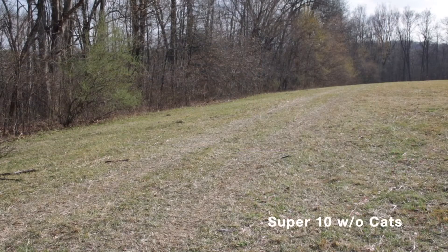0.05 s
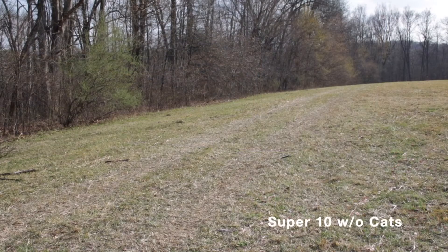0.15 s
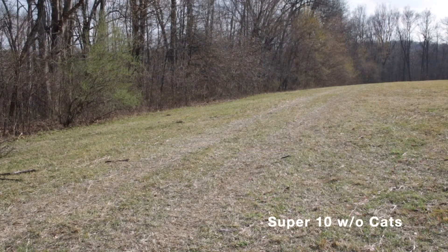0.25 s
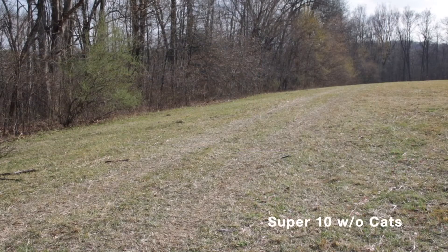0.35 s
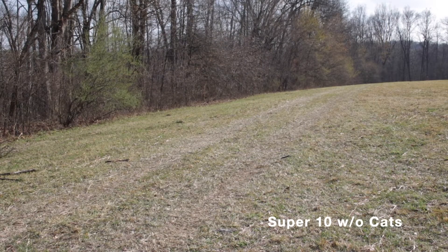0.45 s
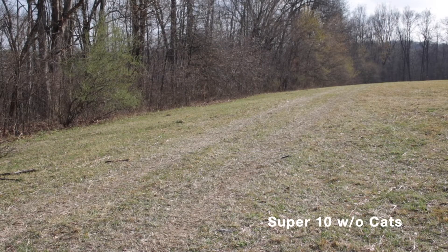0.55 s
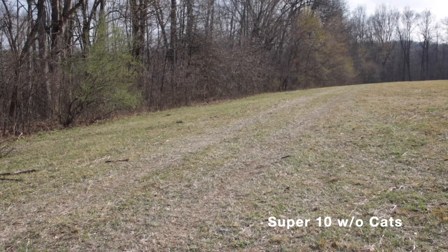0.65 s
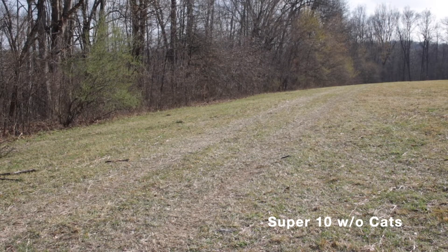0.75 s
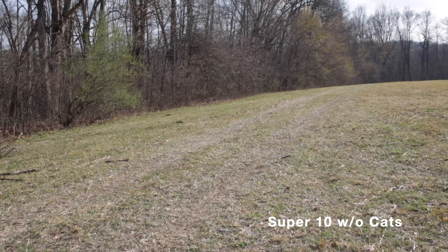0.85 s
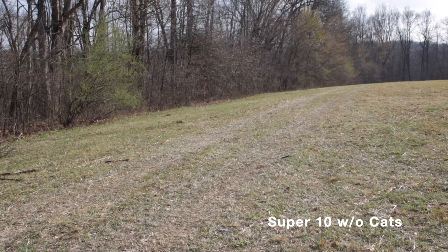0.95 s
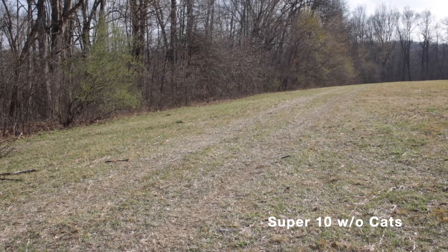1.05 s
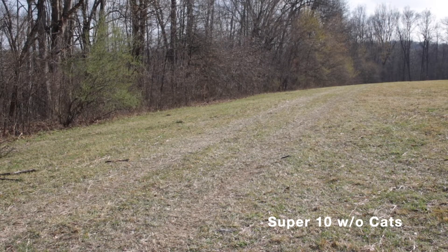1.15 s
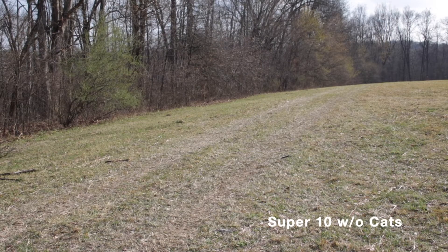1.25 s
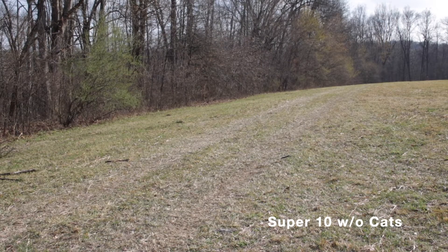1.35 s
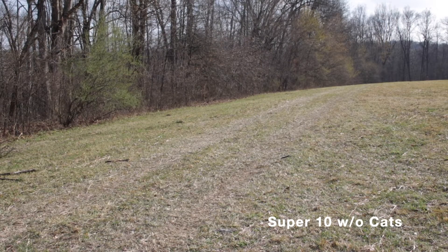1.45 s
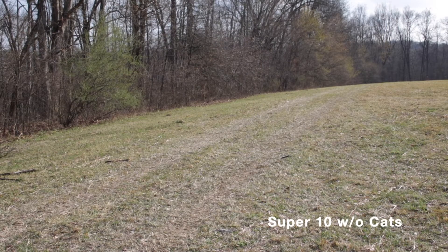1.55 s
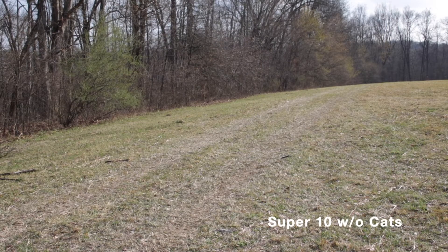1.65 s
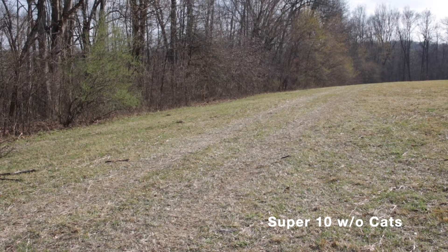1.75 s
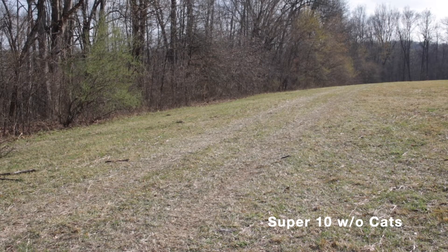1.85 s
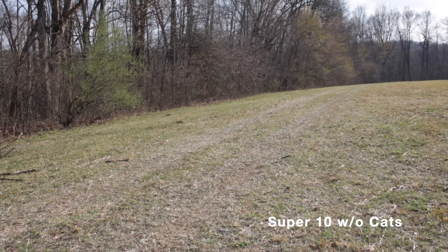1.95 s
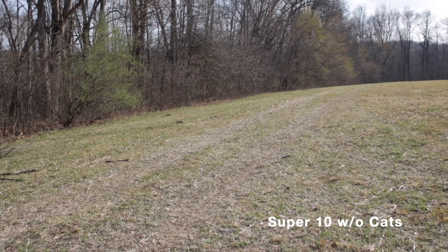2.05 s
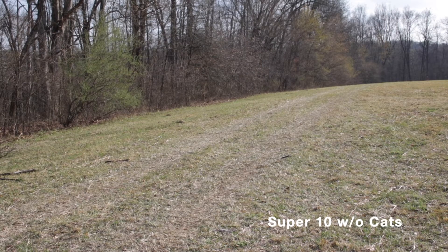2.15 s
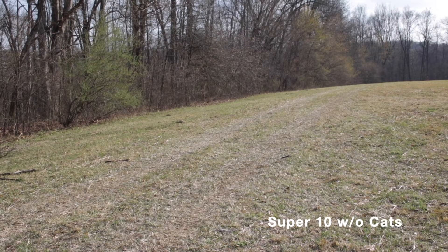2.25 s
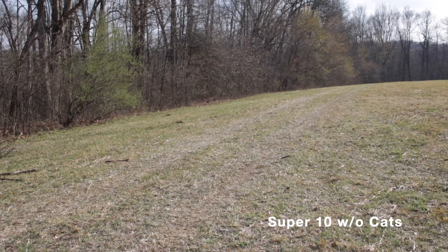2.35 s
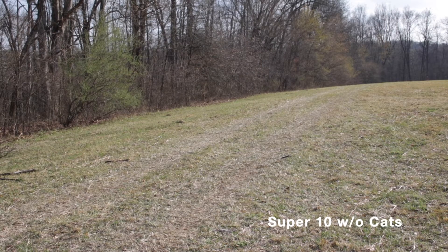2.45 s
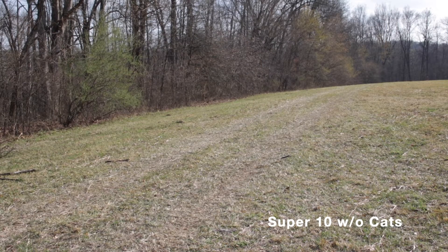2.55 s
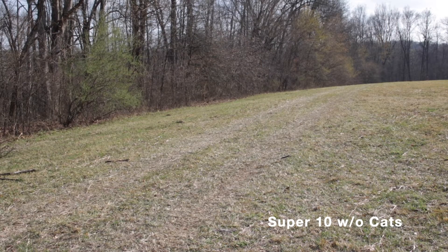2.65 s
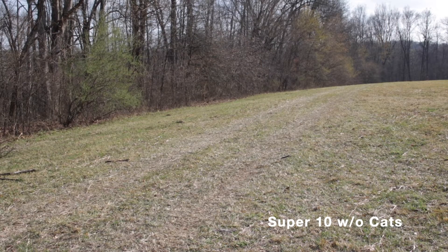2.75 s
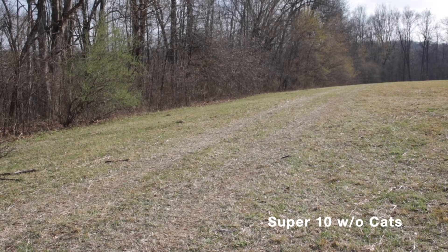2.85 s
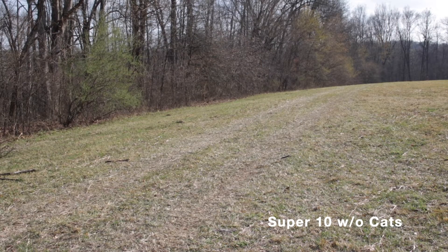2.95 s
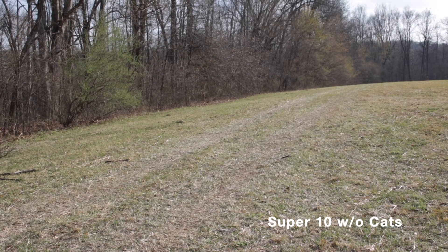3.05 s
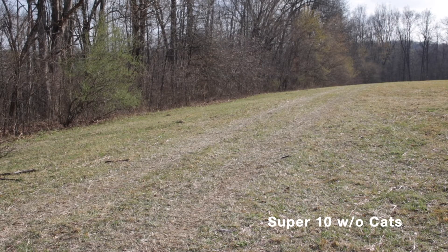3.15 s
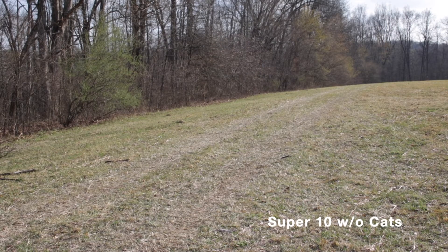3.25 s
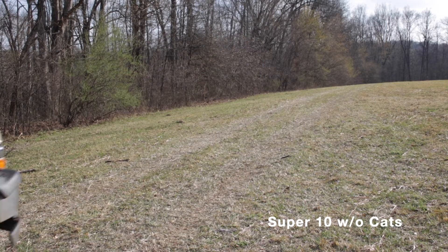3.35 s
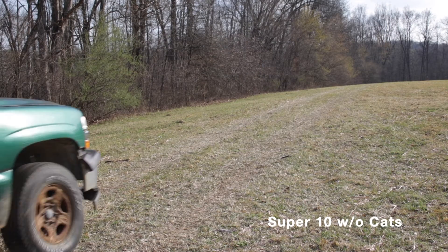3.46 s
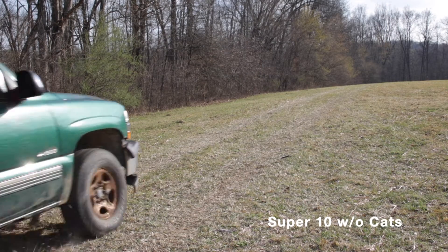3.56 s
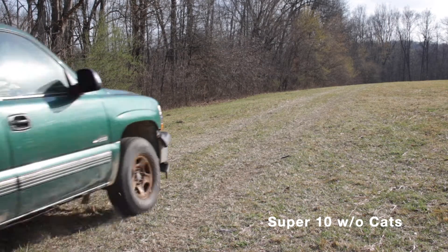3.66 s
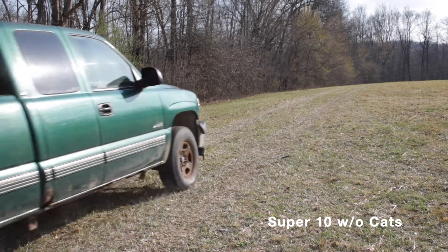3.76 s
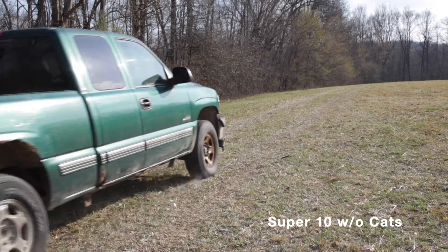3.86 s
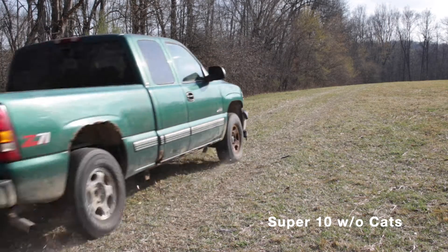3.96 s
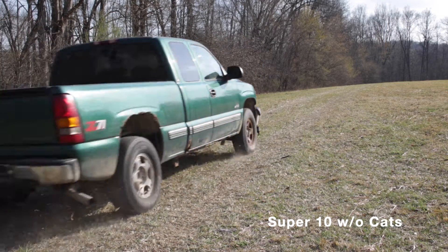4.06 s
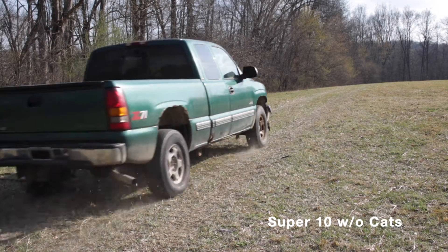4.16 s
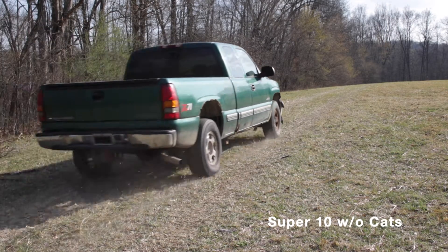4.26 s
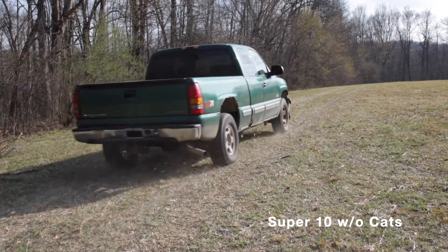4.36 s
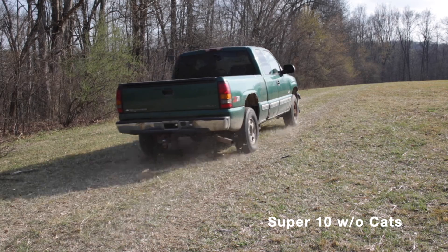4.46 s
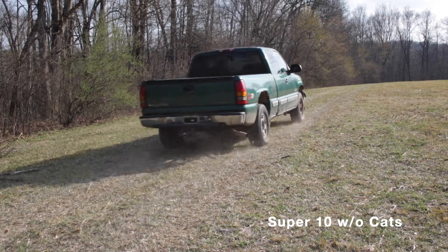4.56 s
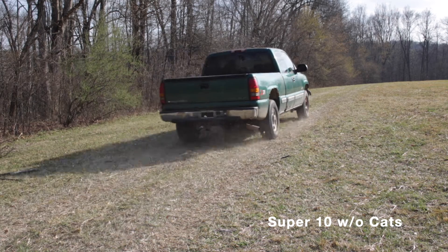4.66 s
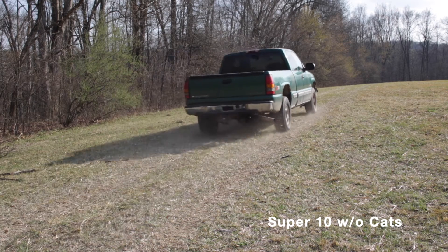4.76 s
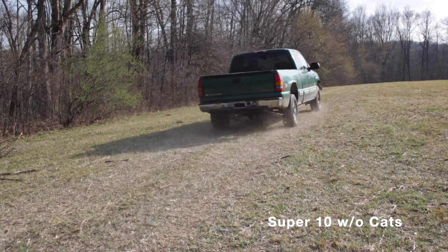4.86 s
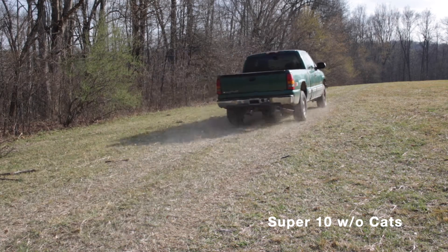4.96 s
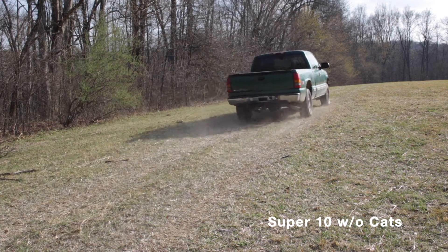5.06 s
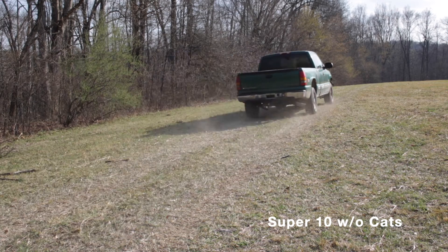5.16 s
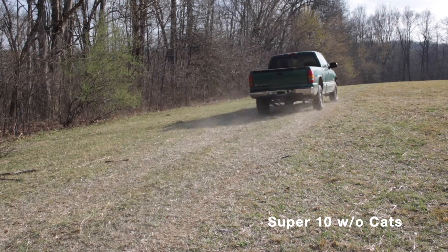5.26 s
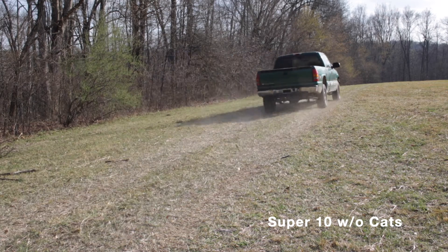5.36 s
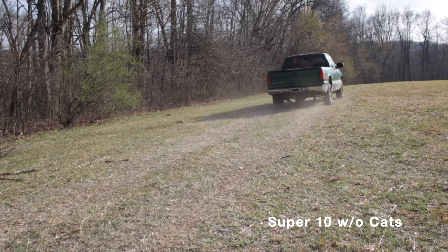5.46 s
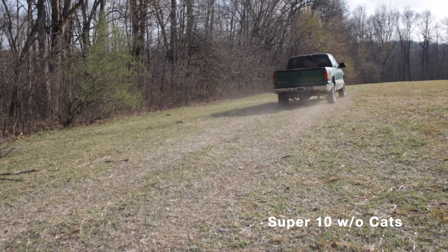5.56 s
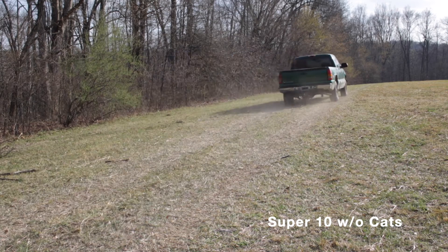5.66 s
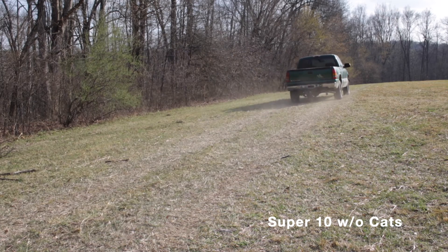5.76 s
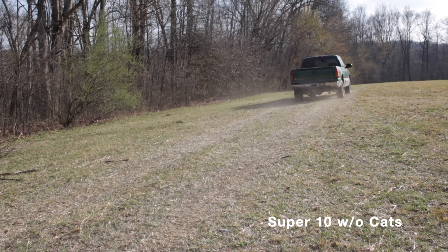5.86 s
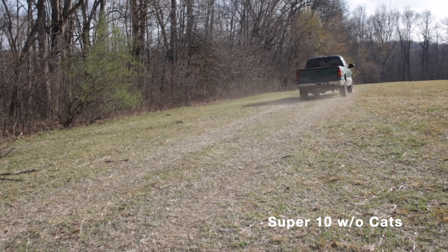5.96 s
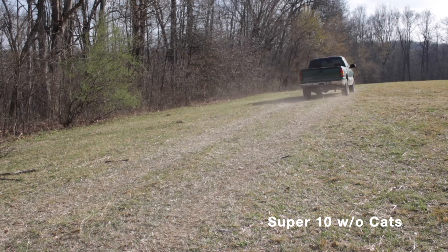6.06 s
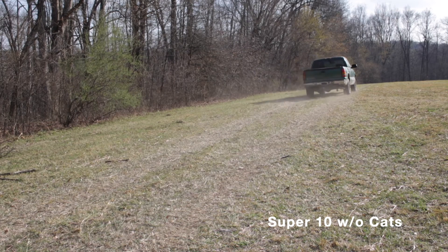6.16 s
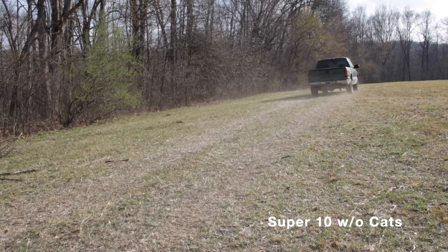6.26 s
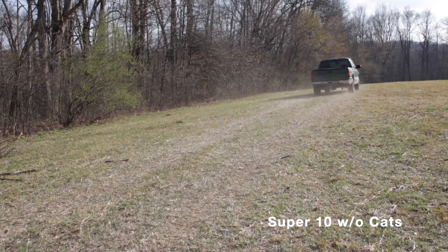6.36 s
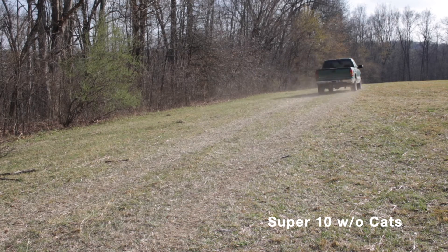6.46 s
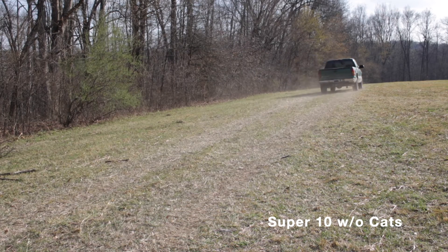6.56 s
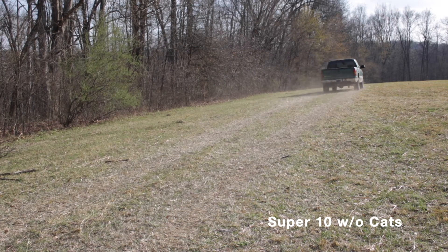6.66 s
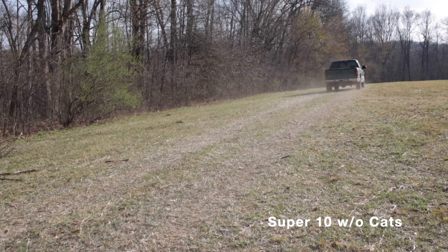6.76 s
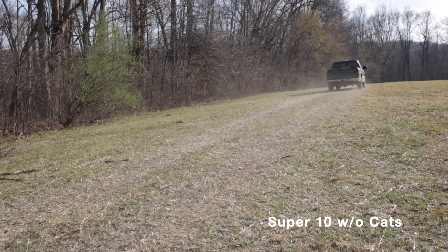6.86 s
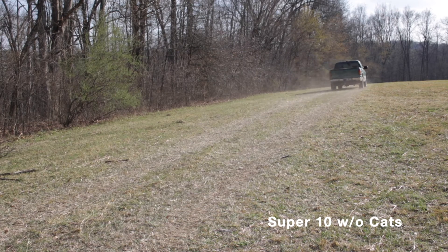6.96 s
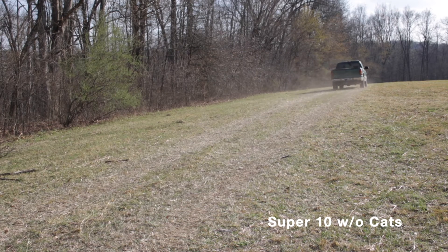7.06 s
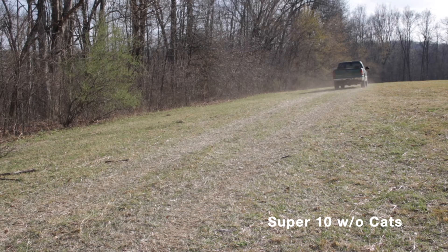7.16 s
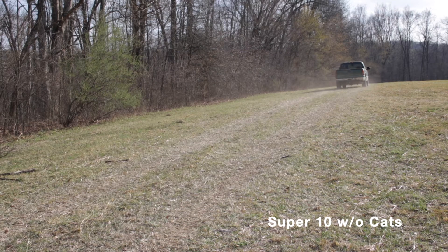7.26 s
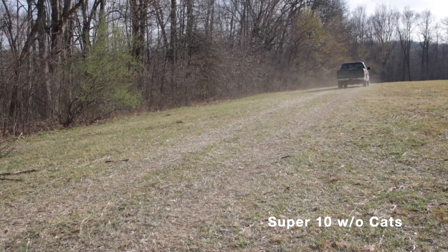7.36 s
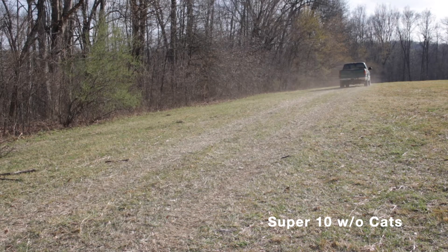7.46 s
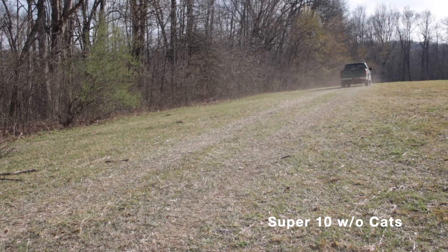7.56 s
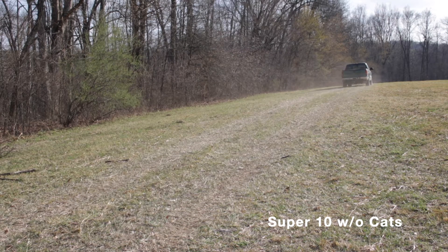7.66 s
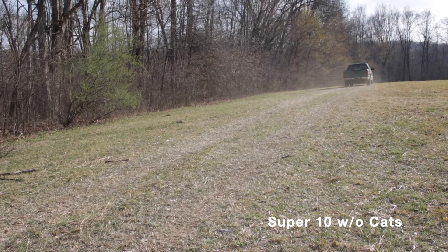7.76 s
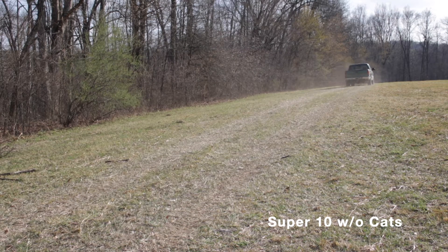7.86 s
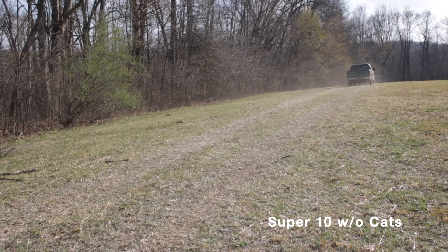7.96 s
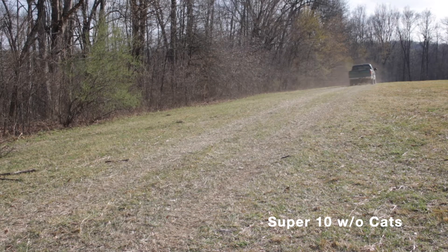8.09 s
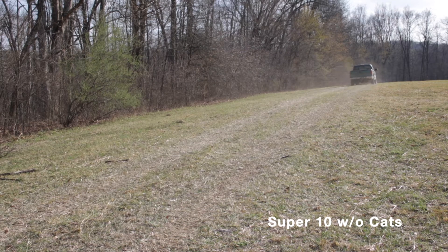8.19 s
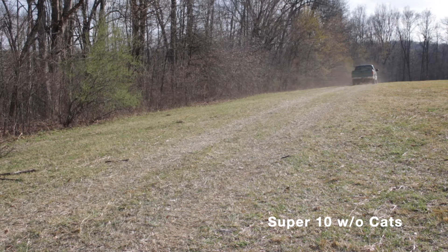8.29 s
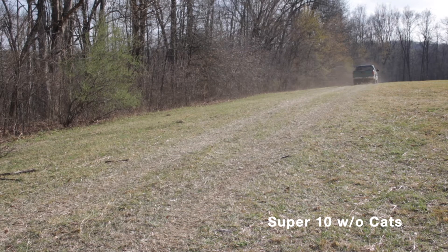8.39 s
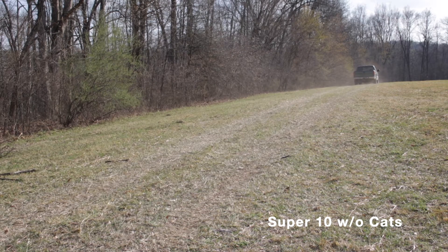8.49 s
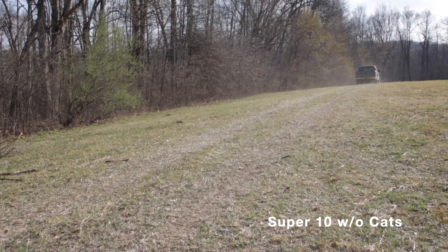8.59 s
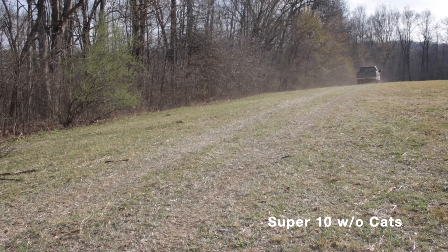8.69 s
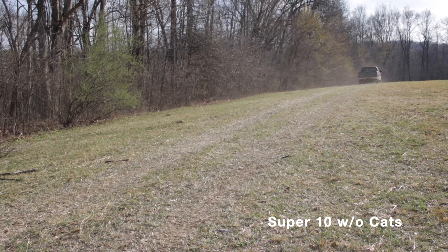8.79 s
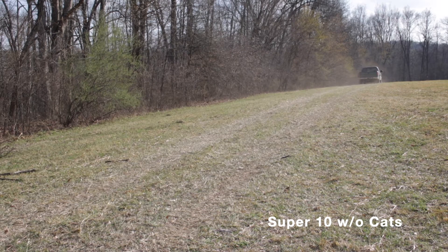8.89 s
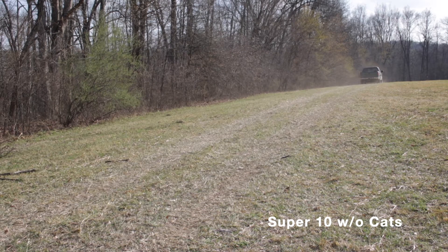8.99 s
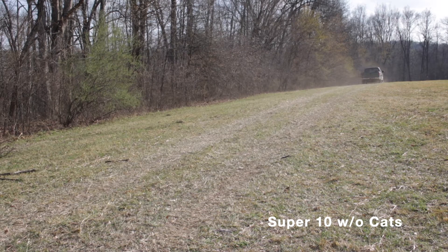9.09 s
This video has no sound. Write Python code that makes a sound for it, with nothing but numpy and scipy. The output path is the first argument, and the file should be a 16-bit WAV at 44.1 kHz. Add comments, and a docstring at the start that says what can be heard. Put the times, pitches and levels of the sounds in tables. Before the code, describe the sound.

A loud-piped pickup on dry dirt, heard from beside the track. Quiet at first: low burble, soft hiss, a faint rising whine. The engine climbs and swells within a couple of seconds, thumps over ruts and bursts past with gritty tyre noise and a low air thud. Loose metal rattles and clanks behind it; the revs fall, the exhaust crackles under power, drops again and continues more softly into the distance.

```python
"""A distant engine burbles over a faint hiss from the truck's front; a loud V8 pickup comes up a dirt track,
passes and drives off. Each firing sends a pulse into resonant pipes; the two cylinder banks beat unevenly.
It shifts up twice. Shaped noise makes the hiss, gas cracks, tyre rush, fizz and the gust of the passing body;
sines make a faint rising whine, ruts that boom the body and loose metal that clanks.
Loud peaks overload the microphone."""
import sys
import numpy as np
from scipy import signal
from scipy.fft import rfft, irfft, next_fast_len
from scipy.io import wavfile
from scipy.ndimage import uniform_filter1d, map_coordinates

SR = 44100
rng = np.random.default_rng(int(sys.argv[2]) if len(sys.argv) > 2 else 0)


def digitize_waveform(pressure):
    """Quantize a signal to 16-bit integers and store it at the path in sys.argv[1].

    Rows of a 2-D input are taken as channels; values are limited to [-1, 1].
    """
    field = np.atleast_2d(pressure).T
    bounded = np.clip(field, -1, 1)
    quanta = np.round(bounded * 32767).astype(np.int16)
    wavfile.write(sys.argv[1], SR, quanta)


N = 402633  # length in samples


def amp(db):
    """Gain of a level in dB."""
    return 10 ** (np.asarray(db) / 20)


def curves(rows):
    """Draw straight lines between table rows: one value per sample for each column after the time."""
    seconds, *columns = np.transpose(rows)
    return [np.interp(np.arange(N) / SR, seconds, column) for column in columns]


def steady(x):
    """Even out the loudness: bring x to rms 1 over a short sliding window."""
    power = uniform_filter1d(uniform_filter1d(x ** 2, size=SR // 6), size=SR // 6)
    return x / np.sqrt(np.abs(power) + 1e-20)


def wobble(rate):
    """A smooth random curve through rate random points a second."""
    points = rng.standard_normal(int(N * rate / SR) + 4)
    return map_coordinates(points, [np.arange(N) * rate / SR])


def filtered(x, response):
    """Filter x by a complex response that depends on frequency."""
    m = next_fast_len(N + SR // 2)
    spectrum = rfft(x, m) * response(np.fft.rfftfreq(m, 1 / SR))
    return irfft(spectrum, m)[..., :N]


def causal(points):
    """Minimum-phase response through (Hz, dB) points: it never rings before its input."""
    def response(hz):
        f, db = np.transpose(points)
        gain = amp(np.interp(np.log(hz + 1), np.log(f + 1), db))
        cepstrum = irfft(np.log(gain))
        # fold the second half onto the first to get minimum phase
        cepstrum[1:len(cepstrum) // 2] *= 2
        cepstrum[len(cepstrum) // 2 + 1:] = 0
        return np.exp(rfft(cepstrum))
    return response


def noise(points):
    """Random noise of even loudness, coloured by (Hz, dB) points."""
    return steady(filtered(rng.standard_normal(N), causal(points)))


def pulses(at, sizes):
    """Impulses at fractional sample positions, each shared between two samples."""
    i = np.clip(at, 0, N - 2).astype(int)
    part = np.clip(at - i, 0, 1)
    return np.bincount(i, sizes * (1 - part), N) + np.bincount(i + 1, sizes * part, N)


def decay(x, seconds):
    """Let every impulse in x die away exponentially."""
    return signal.lfilter([1], [1, -np.exp(-1 / (seconds * SR))], x)


def pipe(modes, shift, low_hz, top_hz, holes=()):
    """Pipe resonances, pitches multiplied by shift; the open end radiates little bass, the muffler eats the top."""
    def response(f):
        ends = f ** 4 / (f ** 4 + low_hz ** 4) / (1 + 1j * f / top_hz) ** 2
        hole = np.prod([(c * c - f * f + .1j * f * w) / (c * c - f * f + 1j * f * w) for c, w in holes], axis=0)
        rings = sum(amp(db) * w * c / ((c * shift) ** 2 - f * f + 1j * f * w) for c, w, db in modes)
        return ends * hole * rings
    return response


# Blend of nose and tail sound: it starts mixed, falls to 0, then rises. Each row: time in seconds,
# share of the tail (0 is all nose, 1 all tail pipe).
FACING = [(0, 0.56), (3.7, 0), (4.2, 0.94), (9.13, 1)]


def tail_share():
    """How much of the tail sound, rather than the nose sound, is heard."""
    return curves(FACING)[0]


def side(coming, going):
    """Blend the coming and going values of a setting by the tail share."""
    return coming + (going - coming) * tail_share()


# Echo off the soil: inverted at grazing angles, later and upright close by.
# Each row: time in seconds, delay in ms, strength as a gain.
SOIL_ECHO = [(0, .294, -.75), (2.95, .3, -.6), (3.1, .42, .3), (3.3, .56, .5), (3.72, .9, .45),
             (4.2, .52, .5), (4.5, .4, 0)]


def with_soil_echo(x):
    """Add the slightly dulled reflection from the ground, which arrives a moment after the direct sound."""
    delay_ms, strength = curves(SOIL_ECHO)
    dulled = uniform_filter1d(x, size=3)
    return x + strength * np.interp(np.arange(N) - delay_ms * SR / 1000, np.arange(N), dulled)


def turned(x, coming, going, echo=False):
    """x through the coming and going filters, blended by the tail share."""
    tail = tail_share()
    heard = (1 - tail) * steady(filtered(x, coming)) + tail * steady(filtered(x, going))
    return steady(with_soil_echo(heard) if echo else heard)


# How fast the engine fires. Each row: time in seconds, firings a second as heard.
FIRING_RATE = [(0.0, 86.3), (0.36, 95.52), (0.72, 95.84), (1.75, 102.48), (2.15, 111.15), (2.47, 133.27),
               (3.04, 145.34), (3.3, 160.1), (3.58, 164.82), (3.84, 176.05), (4.12, 161.52), (4.22, 165.96),
               (4.38, 152.67), (4.68, 108.79), (4.75, 104.56), (5.41, 114.57), (5.57, 120.59),
               (5.94, 123.62), (6.24, 119.63), (6.35, 121.51), (6.85, 121.77), (6.99, 118.18),
               (7.28, 120.65), (7.6, 121.05), (7.9, 108.44), (8.54, 107.93), (9.13, 115.1)]
# One engine cycle. Each row is a cylinder: bank sign, sharpness in dB before a random spread.
CYLINDERS = [(1, -17), (-1, -15), (1, 0), (1, -7), (-1, -15), (1, -3), (-1, -10), (-1, -9)]


def firings():
    """Time and size every firing with small random errors; also give its number and its sharp pulse."""
    fired = np.cumsum(curves(FIRING_RATE)[0]) / SR
    k = np.arange(int(fired[-1]))
    chance = rng.standard_normal((len(k), 3))
    at = np.interp(k + .42, fired, np.arange(N)) + .00006 * SR * chance[:, 0]
    size = amp(.6 * chance[:, 1])
    sharp_db = np.transpose(CYLINDERS)[1]
    # from the front the sharpest firings arrive one place later
    late = (tail_share()[at.astype(int)] < .5).astype(int)
    sharp = pulses(at, amp(sharp_db[(k - late) % 8] + 1.5 * chance[:, 2]))
    return k, at, size, sharp


# Level of the exhaust note. Each row: time in seconds, level in dB before the boost at the pass.
EXHAUST = [(0.0, -43), (1.55, -32.5), (1.75, -28), (2.21, -27), (2.9, -12.5), (3.28, -14), (3.58, -9),
           (3.89, -4.5), (4.42, -15), (4.58, -8), (4.65, -16.5), (4.78, -11.5), (5.39, -16), (5.95, -13),
           (6.26, -17), (6.92, -16), (7.02, -20), (7.45, -17.5), (7.86, -20), (7.93, -16.5), (8.26, -16.5),
           (9.13, -23)]


def exhaust_levels():
    """Levels in dB of the even tone and the uneven burble, whose share grows with the revs."""
    boost_db, closest_s, pass_s = 3, 3.86, 0.26  # extra drive, its time and half length
    low_db, high_db, middle_hz, span_hz = -8, -0.5, 118.2, 7.6  # burble over tone, by firings a second
    t = np.arange(N) / SR
    note_db = curves(EXHAUST)[0] + boost_db * np.exp(-((t - closest_s) / pass_s) ** 2)
    rate = curves(FIRING_RATE)[0]
    over_db = low_db + (high_db - low_db) / (1 + np.exp((middle_hz - rate) / span_hz))
    # share the power between the two
    tone_db = note_db - 10 * np.log10(1 + amp(over_db) ** 2)
    return tone_db, tone_db + over_db


def piped(x, modes, **ends):
    """Firings ringing in one pipe, with higher pitches in the coming sound than in the going sound."""
    return turned(x, pipe(modes, 1.054, **ends), pipe(modes, 0.95, **ends))


# Pipe resonances of the even tone. Each row: base pitch in Hz (shifted in use), width in Hz, strength in dB.
TAIL_PIPE = [(124, 83, 27), (245, 13.3, 19), (394, 28, -27), (472, 29, -30.5), (634, 22, -33.5)]


def even_tone(at, size):
    """Every firing rings the tail pipe alike, which gives the steady note."""
    return piped(pulses(at, size), TAIL_PIPE, low_hz=51, top_hz=394)


# Uneven filling, one row per cylinder: push into its bank in dB, signed share of the uneven filling.
FILLING = [(-4, 0.61), (2, -0.099), (3, -0.49), (1.5, 0.37), (1.9, 1), (1, 0.11), (1, -.92), (-0.7, -0.67)]
# Bank pipe from the front and from behind. Each row: base pitch in Hz (shifted in use),
# width in Hz, strength in dB.
BANK_FRONT = [(68.5, 10, -10.5), (118.2, 9.3, -3.5), (210.7, 16, 4), (320.3, 13.8, -0.5),
              (418.5, 4.6, -16.5), (508, 22, -7)]
BANK_REAR = [(80, 4.3, -8.5), (190.9, 27.3, 12.5), (302.4, 15.6, 10.5), (428, 21, 3), (547, 35, -6),
             (688, 15, -7), (964, 28, -8.5)]
# What the muffler swallows: one list coming, one going. Each row: pitch in Hz, width in Hz.
MUFFLER_HOLES = ([(136, 20), (236, 19)], [(147, 59), (250, 48), (345, 74)])
# Header resonances. Each row: base pitch in Hz (shifted in use), width in Hz, strength in dB.
HEADERS = [(143, 19, -4), (287, 45, -12.5), (390.7, 8.3, 0), (537, 33, -17)]


def uneven_burble(k, at, size):
    """What one bank pushes the other does not: the uneven beat of a cross-plane crank."""
    bank = np.transpose(CYLINDERS)[0]
    push_db, uneven = np.transpose(FILLING)
    bank_push = (bank * amp(push_db))[k % len(bank)]
    front = pipe(BANK_FRONT, 0.927, low_hz=65, top_hz=1100, holes=MUFFLER_HOLES[0])
    rear = pipe(BANK_REAR, 0.95, low_hz=61, top_hz=1080, holes=MUFFLER_HOLES[1])
    banks = turned(pulses(at, size * bank_push), front, rear)
    headers = piped(pulses(at, size * uneven[k % len(bank)]), HEADERS, low_hz=102, top_hz=1070)
    return banks + amp(-6.5) * headers


def pipe_rumble():
    """Turbulence in the pipes, made as a band of low noise."""
    return noise([(45, -47.0), (90, 10.5), (200, 13), (450, 8.0), (800, -52.5)])


def gas(puff, depth):
    """Rushing gas noise; each firing blows a short gust through it."""
    return (1 + depth * puff) * rng.standard_normal(N)


def grit(rate, spread_db):
    """Gain that jumps for about a millisecond wherever a tyre cracks a clod or stem, rate times a second."""
    draw = rng.random((int(rate * N / SR), 2))
    sizes = .3 * amp(-spread_db * np.log(draw[:, 1] + .004))
    return 1 + decay(pulses(draw[:, 0] * N, sizes), 0.0015)


# Engine load. Each row: time in seconds, how hard the firings crack against the steady gas noise.
LOAD = [(0, .15), (2.3, .2), (2.45, 1.4), (2.7, 1.2), (2.85, .45), (3.5, .45), (4.5, .5), (5.5, .6),
        (5.8, 1.1), (6.9, 1.1), (7.6, .6), (7.9, .2), (9.13, .3)]
# Colour of the cracks: one list coming, one going. Each row: frequency in Hz, relative level in dB.
CRACK_COLOUR = ([(300, -11), (500, -1.5), (1000, 0.5), (1400, -6.5), (1760, -1.5), (2100, -14.5),
                 (2600, -15.5), (3500, -55)], [(290, -32.5), (500, 9.5), (663, 8.5), (769, 6), (898, 8.5),
                 (1110, 1), (1300, 4), (1410, -0.5), (1940, -16.5), (2500, -19), (3250, -59.5),
                 (5500, -120)])


def crack(puff, sharp):
    """Sharp firing pulses stand out of gas noise, more so under load."""
    load = curves(LOAD)[0]
    mixed = steady(gas(puff, 0.12)) - load * steady(sharp)
    return turned(mixed, *map(causal, CRACK_COLOUR), echo=True)


# Colour of the rush: one list coming, one going. Each row: frequency in Hz, relative level in dB.
RUSH_COLOUR = ([(1500, 3), (2300, 4.5), (3500, 8.5), (4300, 0.5), (5000, 3.5), (5600, -14), (6500, -22),
                (8500, -49)], [(1240, -7), (2100, -2), (2270, -8), (2460, 0.5), (3270, 2), (4110, 0),
                (4570, -3), (4980, -22), (5590, -25), (6000, -55), (6400, -42), (8320, -55), (14100, -120)])


def tyre_rush(puff):
    """Tyres on dirt: noise that wavers, is roughened by grit and pulses with the firings."""
    rough = gas(puff, 0.23) * amp(1.9 * wobble(11)) * grit(680, 4.8)
    return turned(rough, *map(causal, RUSH_COLOUR), echo=True)


# Colour of the fizz: one list coming, one going. Each row: frequency in Hz, relative level in dB.
FIZZ_COLOUR = ([(3240, 2.5), (5500, 0), (6470, -5.5), (7260, -8.5), (9790, -14), (13300, -27),
                (15700, -34)], [(2880, 4.5), (4900, -2), (5250, 1), (5590, -4.5), (6020, 0.5), (6410, 0.5),
                (9570, -9), (11300, -20), (15700, -42.5)])


def fizz(puff):
    """High gas noise with strong firing gusts and sparse grit."""
    rough = gas(puff, 0.42) * amp(0.97 * wobble(17)) * grit(100, 4.3)
    return turned(rough, *map(causal, FIZZ_COLOUR))


# Level of the tyre rush. Each row: time in seconds, level in dB.
TYRES = [(0, -66), (1.96, -58), (2.3, -48.5), (2.6, -38.5), (3.31, -28), (3.61, -19.5), (3.92, -17.5),
         (3.99, -25), (4.24, -30), (4.63, -38.5), (4.75, -39.5), (4.83, -33.5), (5.16, -37.5), (5.6, -35),
         (6.46, -43.5), (7.42, -48), (7.88, -42.5), (7.94, -38.5), (8.16, -42), (8.3, -43.5), (9.13, -46)]


def noise_levels():
    """Levels in dB of crack, rush and fizz: they follow the tyre rush, the tail share and the load."""
    load = curves(LOAD)[0]
    rush_db = curves(TYRES)[0]
    loudest = rush_db.max()
    # each pair: coming, going
    crack_db = rush_db + side(4.5, 1.5) + side(1, 6) * load
    fizz_db = loudest + side(-1, -16) + side(-1.5, 4) * load
    fizz_db = fizz_db + side(0.77, 0.8) * (rush_db - loudest)  # dB of fizz per dB of rush
    return crack_db, rush_db, fizz_db


def air_push():
    """The body pushes air at the microphone: very low noise with a gust at the pass."""
    peak_db, peak_s, rise_s, fall_s = -20, 3.9, 0.081, 0.1
    t = np.arange(N) / SR
    gust = np.exp(-np.maximum((peak_s - t) / rise_s, (t - peak_s) / fall_s))
    level = amp(side(-66.5, -48.5)) + amp(peak_db) * gust
    return level * noise([(8, 1), (20, -31.5), (32, -32.5), (50, -52.5)])


def truck():
    """Add the exhaust, gas and tyre noises, which share the same firings, and the pushed air."""
    k, at, size, sharp = firings()
    puff = steady(decay(sharp, .0035))
    tone_db, burble_db = exhaust_levels()
    crack_db, rush_db, fizz_db = noise_levels()
    exhaust = amp(tone_db) * even_tone(at, size) + amp(burble_db) * uneven_burble(k, at, size)
    exhaust += amp(burble_db - 10) * pipe_rumble()
    hiss = amp(crack_db) * crack(puff, sharp) + amp(rush_db) * tyre_rush(puff) + amp(fizz_db) * fizz(puff)
    return exhaust + hiss + air_push()


# Colour of the hiss from the truck's front. Each row: frequency in Hz, relative level in dB.
FRONT_HISS_COLOUR = [(710, -46.5), (1200, -22.5), (1750, -9), (1930, -26), (3160, -33), (3520, -27.5),
                     (4510, -13.5), (4970, -9.5), (5970, -24.5), (6800, -25.5), (7330, -32), (12000, -31.5),
                     (15700, -41)]
# Its loudness. Each row: time in seconds, level in dB before a small random wobble.
FRONT_HISS_LEVEL = [(0, -57), (1.5, -56), (2.4, -50), (3.5, -51), (4.2, -62.5), (9.13, -67)]


def front_hiss():
    """A smooth hiss from the front of the truck, perhaps its fan, that drops once the truck has passed."""
    return amp(curves(FRONT_HISS_LEVEL)[0] + 1.3 * wobble(4.3)) * noise(FRONT_HISS_COLOUR)


def whine():
    """A faint unsteady tone that climbs, swells and fades while the truck is far off."""
    loudest_s, hz, hz_per_s = 1.65, 1100, 75  # the pitch is hz at the loudest moment
    level_db, rise_db_per_s, fall_db_per_s = -53, 30, 60
    t = np.arange(N) / SR - loudest_s
    db = level_db - np.maximum(-t * rise_db_per_s, t * fall_db_per_s)
    tone = np.sin(2 * np.pi * (hz + hz_per_s * t / 2) * t)
    return np.sqrt(2) * amp(db + wobble(15.5)) * tone


# Ruts. Each row: time in seconds, relative level in dB, base pitch in Hz.
BUMPS = [(3.172, -10, 453), (3.459, -9.5, 431.6)]


def bumps():
    """The body booms over a rut: a few panel tones swell quickly and die away."""
    out, t = np.zeros(N + SR), np.arange(SR // 4) / SR
    panel_modes = [(.7, -1), (1, 9), (1.22, 2), (1.6, 0), (2.05, -8.5)]  # multiple of the pitch, dB
    for s, db, hz in BUMPS:
        panel = sum(amp(level) * np.sin(2 * np.pi * hz * k * t) for k, level in panel_modes)
        out[round(s * SR):][:len(t)] += amp(db - 60 * t / 0.16) * panel * (1 - np.exp(-t / 0.014))
    return out[:N]


# Clanks. Each row: time in seconds, level in dB before a 4 dB cut, base pitch in Hz,
# level of its click in dB before the clank's own level.
CLANKS = [(4.0643, -17.5, 1405, -19), (4.2669, -11.5, 1520, -17), (4.391, -21.5, 1614, -27),
          (4.559, -36.5, 1330, -16), (4.809, -16, 1480, -16.5), (4.9372, -24.5, 1670, -18),
          (5.2448, -26, 1720, -16), (5.4644, -36.5, 1730, -5), (7.02, -38, 1370, -3),
          (7.1294, -37.5, 1610, 2.5), (7.587, -35, 1470, -9), (7.917, -30, 1460, -7),
          (8.0024, -40.5, 1820, -15)]
# Tones in each clank. Each row: multiple of the pitch, level in dB before a random spread,
# seconds to fall by 60 dB.
LOOSE_METAL = [(1, 3.5, 0.085), (1.147, 1, 0.065), (1.239, -4, 0.057), (1.6, -8, 0.042), (2.05, -11.5, .04),
               (.63, -20, 0.053)]


def clanks():
    """Loose metal rings at several unrelated pitches, with a bright noise click at the strike."""
    out, t = np.zeros(N + SR), np.arange(SR // 4) / SR
    for s, db, hz, click_db in CLANKS:
        ring = sum(amp(level + rng.normal(0, 2.3) - 60 * t / t60) * np.sin(2 * np.pi * hz * k * t)
                   for k, level, t60 in LOOSE_METAL)
        bright = signal.lfilter([.5, 0, -.5], [1, -1.55, .7], rng.standard_normal(len(t)))
        click = amp(click_db - 60 * t / 0.06) * bright
        out[round(s * SR):][:len(t)] += amp(db - 4) * (ring + click) * (1 - np.exp(-t / 0.00018))
    return out[:N]


def scene():
    """Everything reaches one microphone in the open."""
    return (truck() + front_hiss() + whine() + bumps() + clanks())[None]


def record(dry):
    """The input stage rounds off peaks near 0.8, then everything above 15890 Hz is cut."""
    clipped = dry / (1 + np.abs(dry / .8) ** 10) ** (1 / 10)
    return filtered(clipped, lambda hz: hz < 15890)


dry = scene()
out = record(dry)
digitize_waveform(out)
```